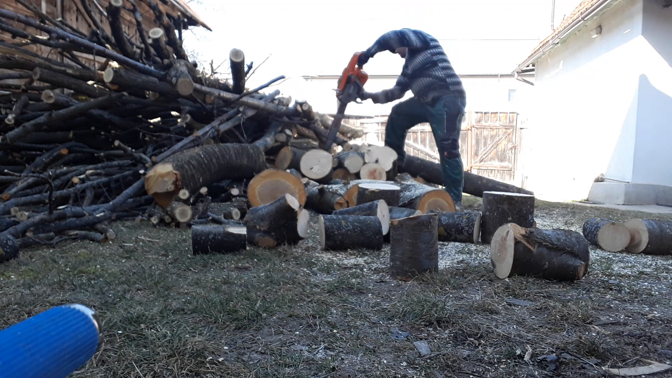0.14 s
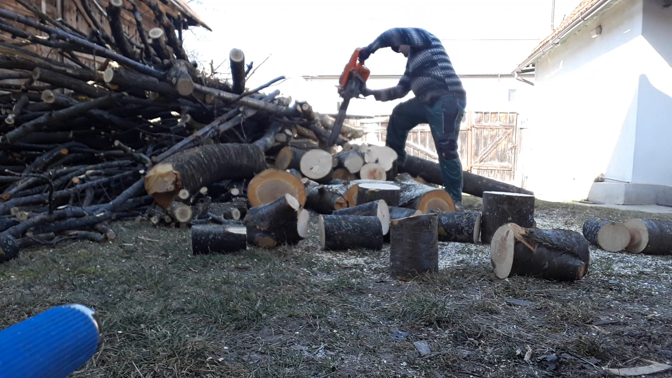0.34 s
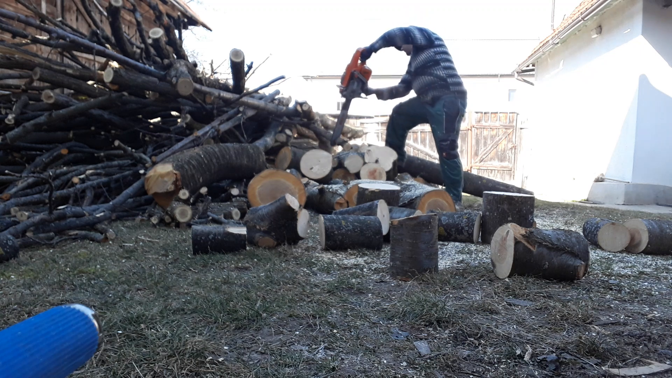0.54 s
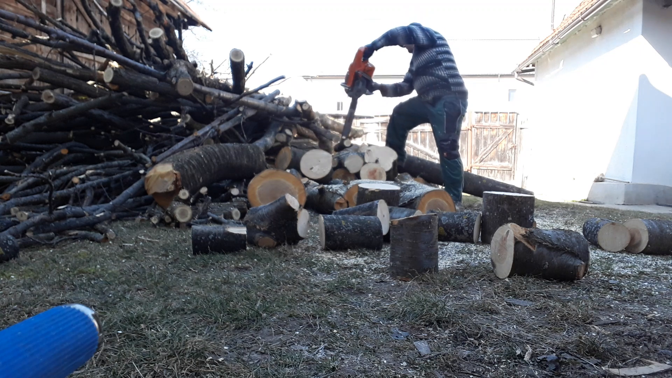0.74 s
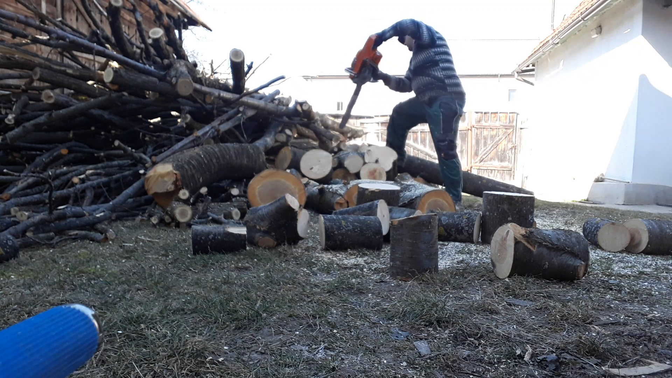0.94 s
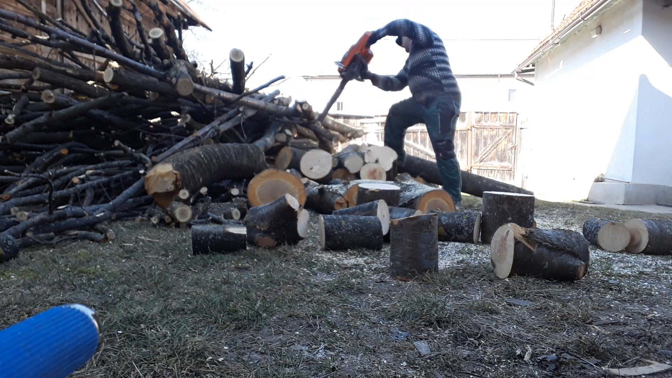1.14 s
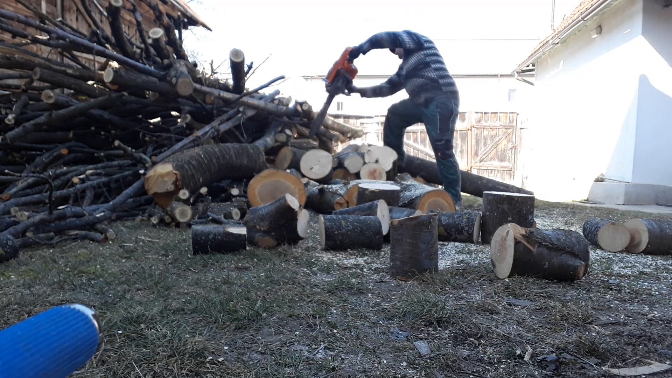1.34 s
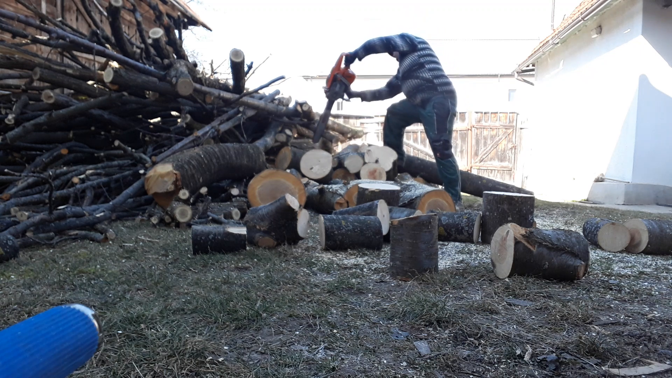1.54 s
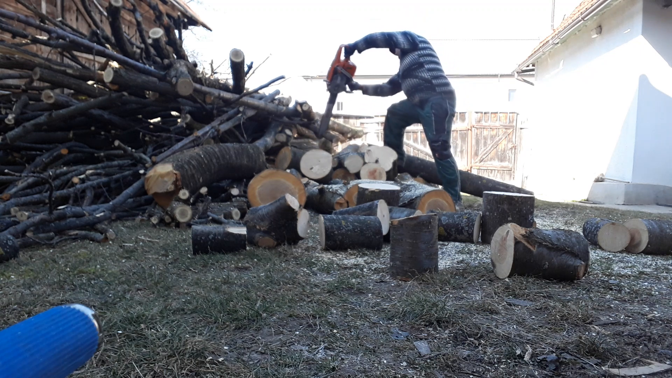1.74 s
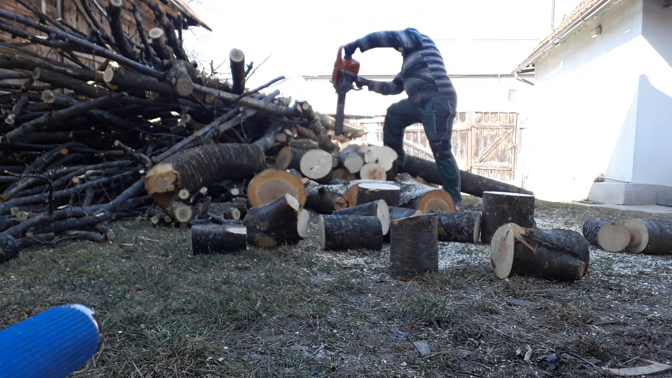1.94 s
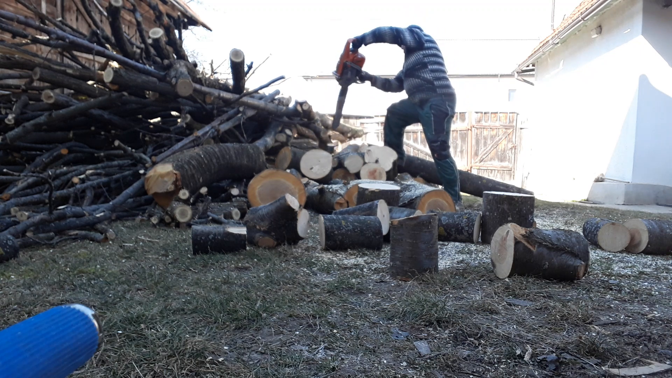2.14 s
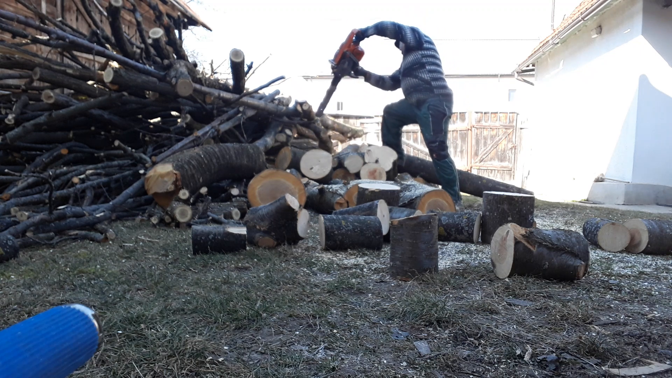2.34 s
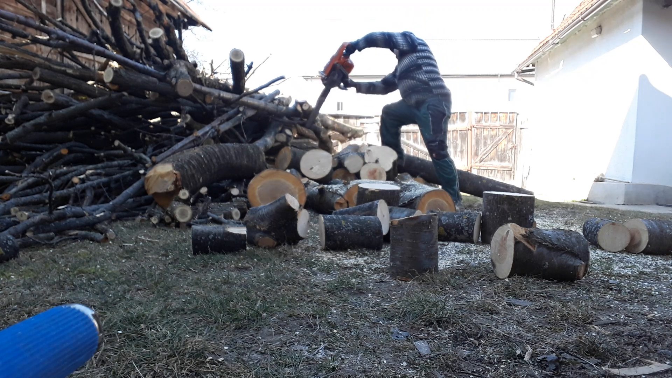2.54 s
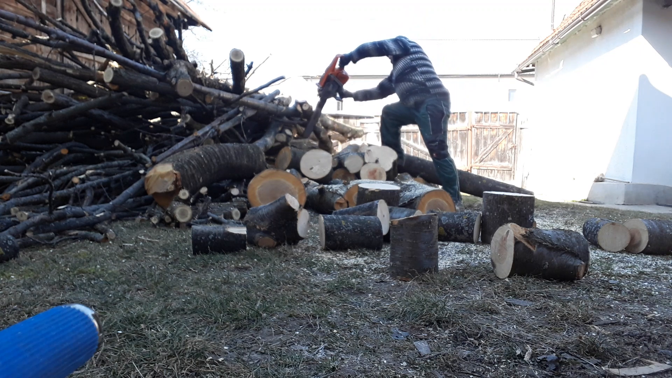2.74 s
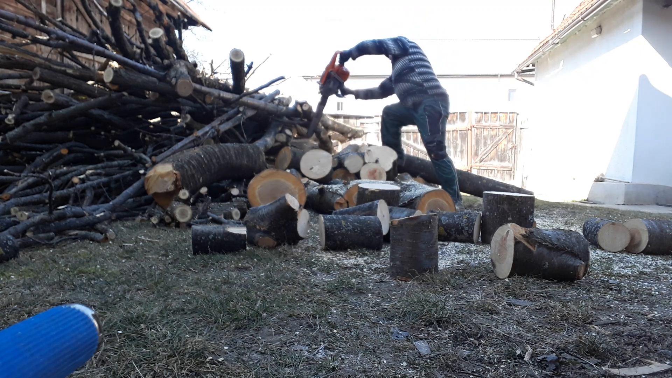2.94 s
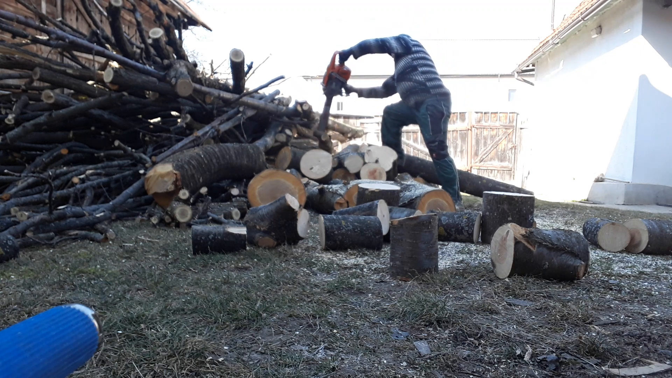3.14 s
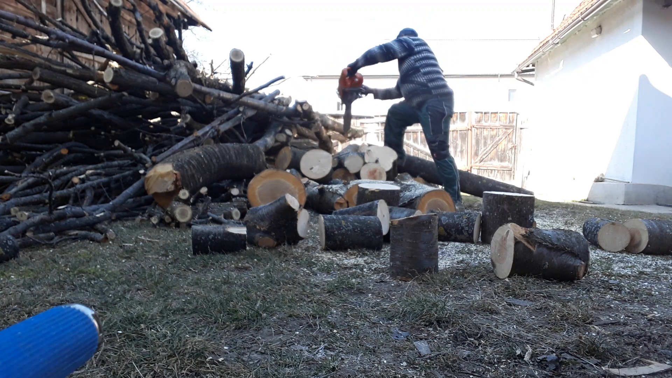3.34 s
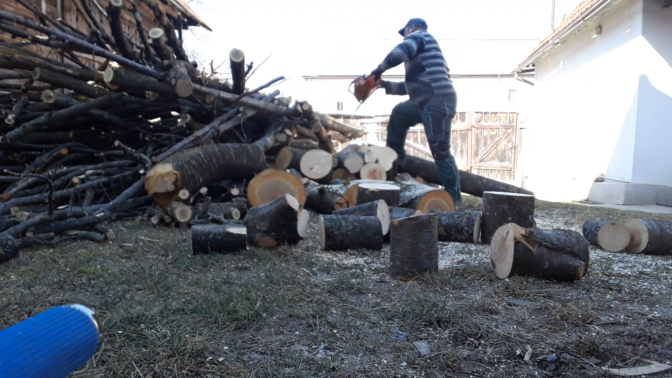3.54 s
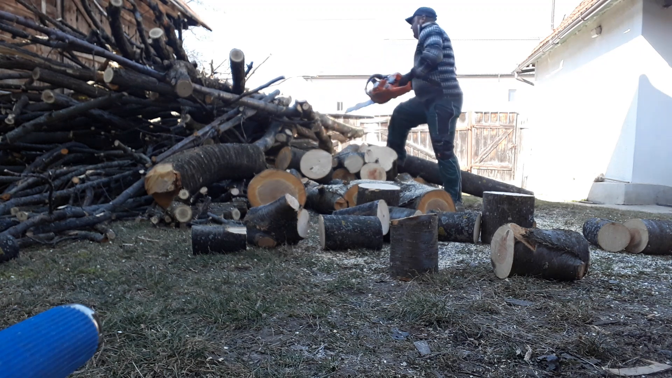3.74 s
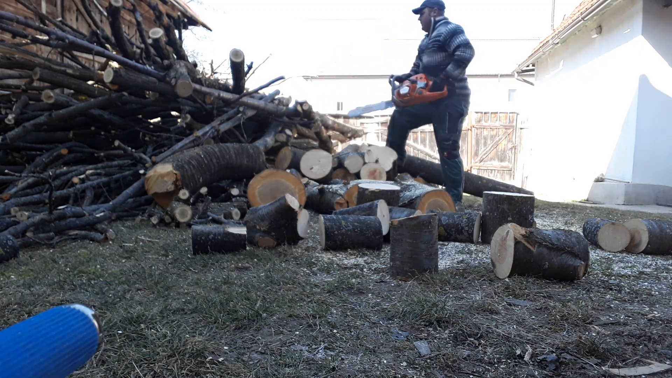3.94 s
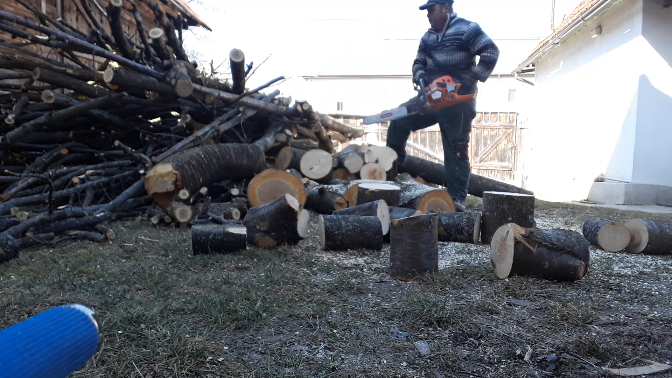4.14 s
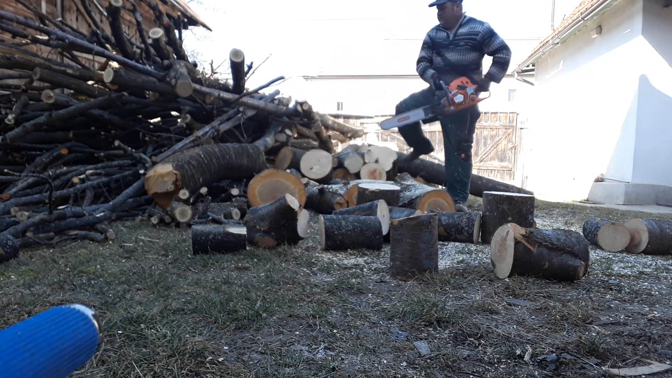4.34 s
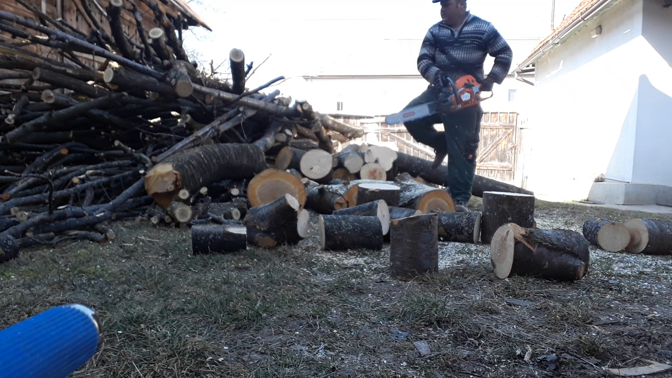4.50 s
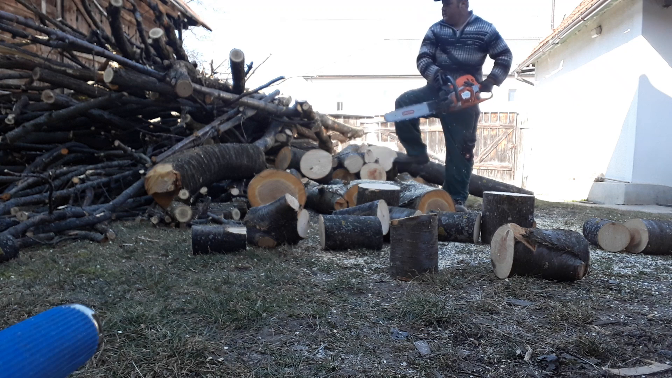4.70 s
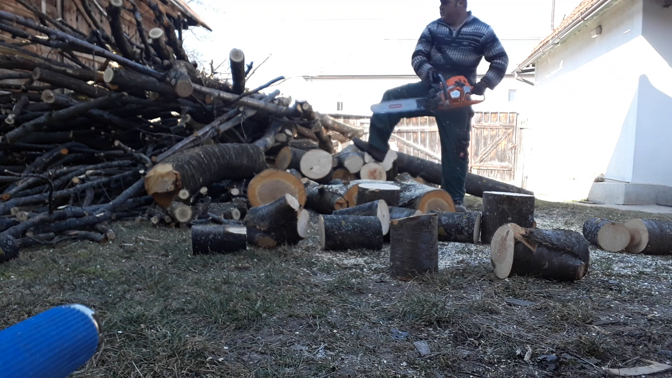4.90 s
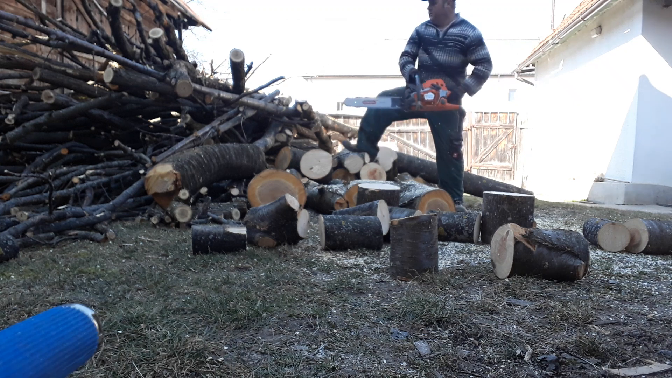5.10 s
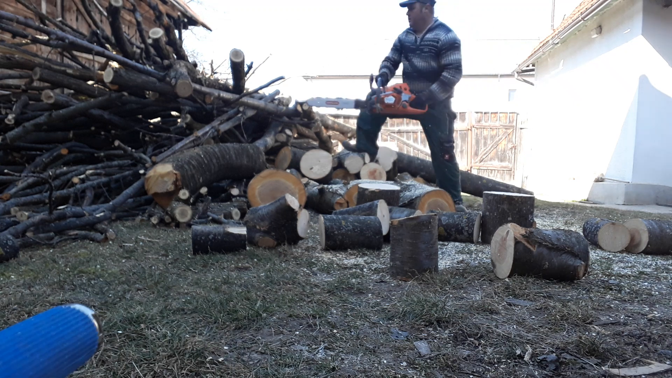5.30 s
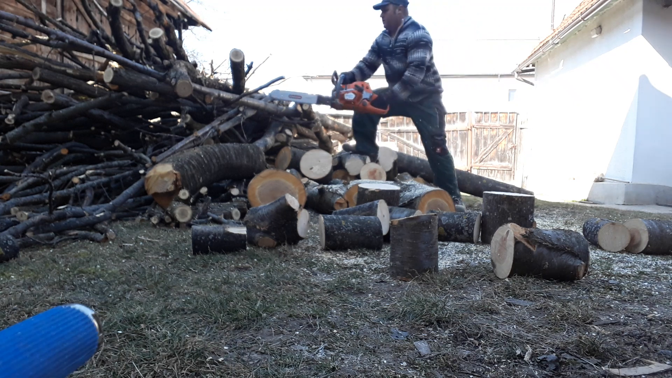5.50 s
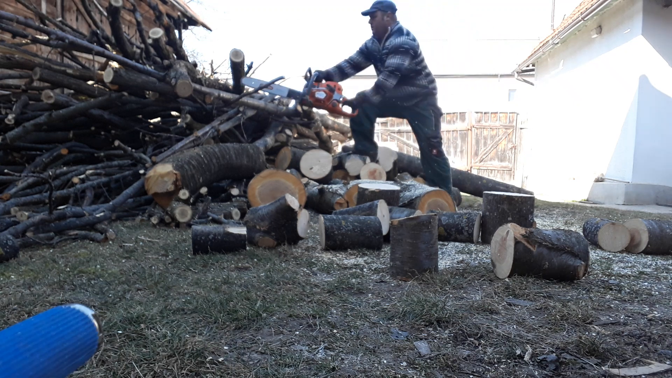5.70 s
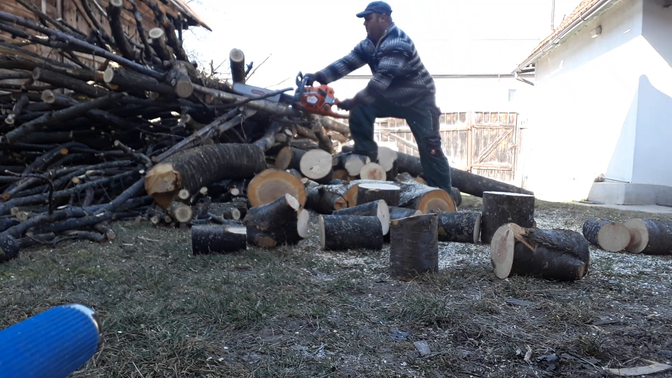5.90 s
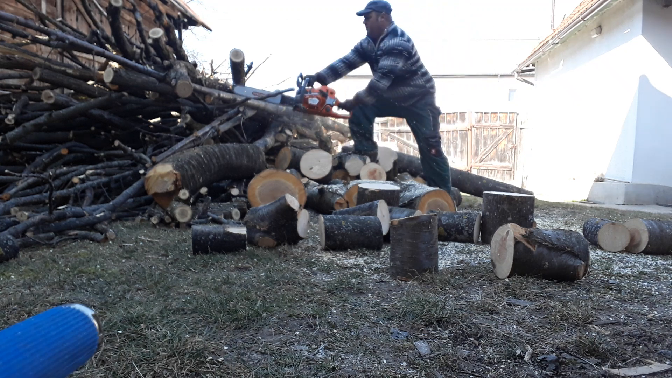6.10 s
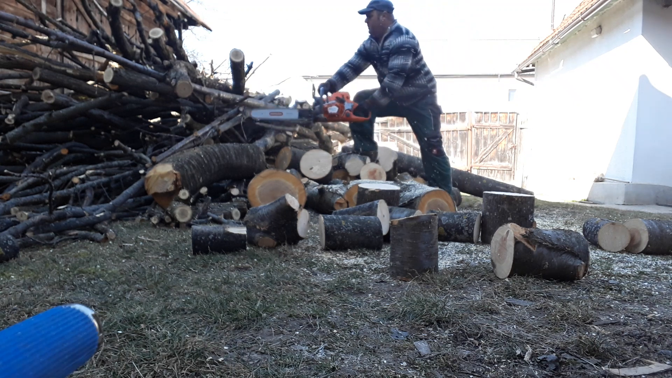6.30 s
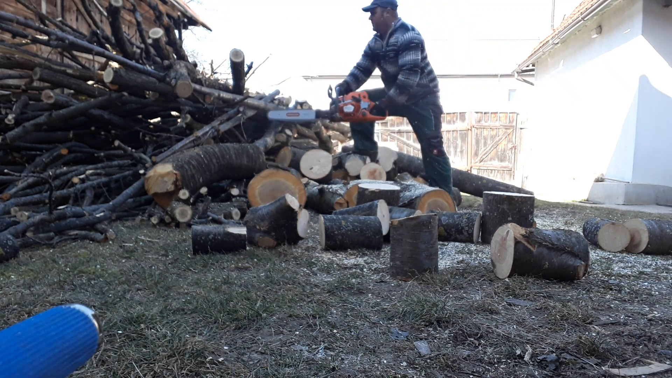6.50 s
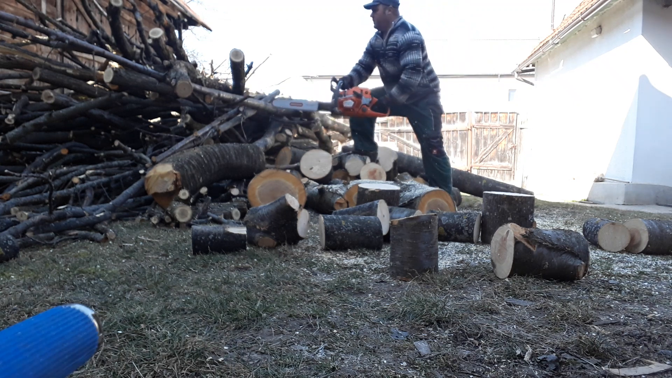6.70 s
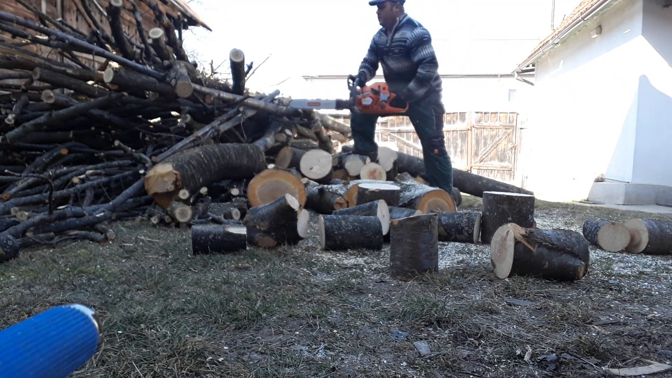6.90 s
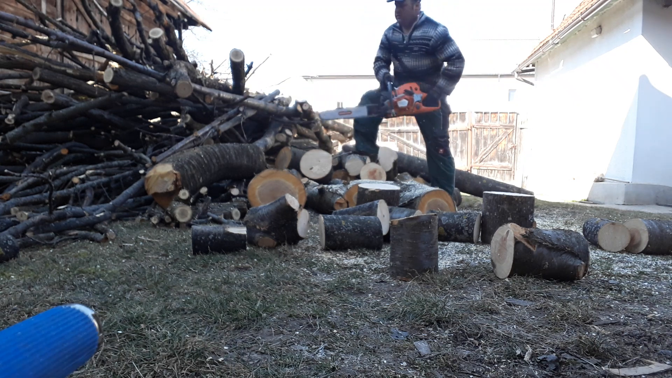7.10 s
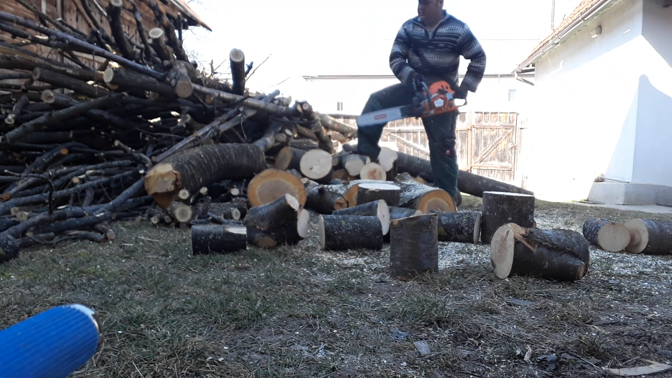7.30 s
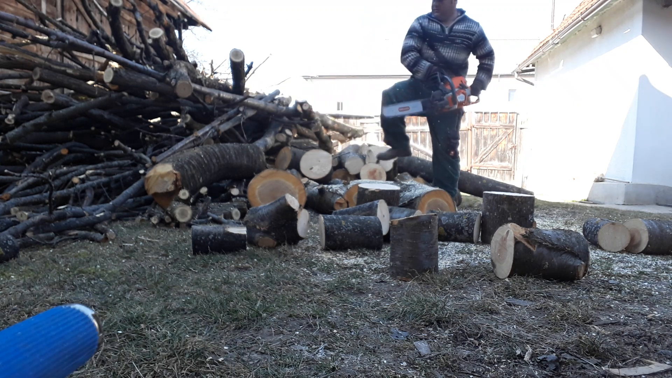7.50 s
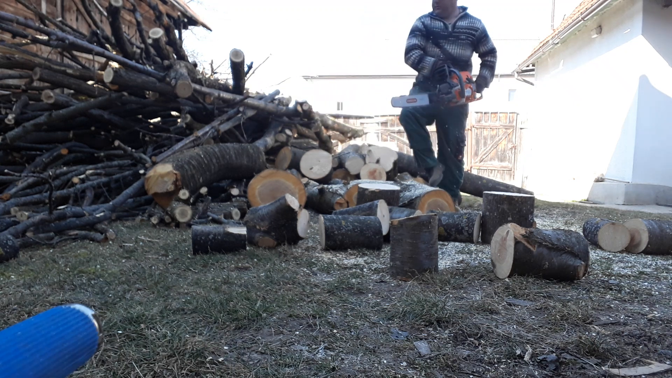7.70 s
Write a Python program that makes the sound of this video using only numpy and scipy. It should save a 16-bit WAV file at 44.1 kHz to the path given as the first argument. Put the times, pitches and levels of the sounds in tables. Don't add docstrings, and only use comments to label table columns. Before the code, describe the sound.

Small two-stroke saw engine heard at close-to-medium distance outdoors, with short slap off a wall and log pile. It swoops up and down in three blips without cutting wood, settles to stuttering idle with sharp isolated cracks, leaps up hard, dips, revs to its highest scream with jangling clutch metal, then sinks back to rough idle. Loud and bright, the microphone lightly clipped at peaks.

```python
import sys
import numpy as np
from scipy import signal
from scipy.fft import rfft, irfft, next_fast_len
from scipy.io import wavfile
from scipy.ndimage import uniform_filter1d, map_coordinates

SR = 44100
rng = np.random.default_rng(int(sys.argv[2]) if len(sys.argv) > 2 else 0)


def materialize(psi):
    bounded = np.clip(np.atleast_2d(psi).T, -1, 1)
    quanta = np.round(bounded * 32767).astype(np.int16)
    wavfile.write(sys.argv[1], SR, quanta)


def attenuation_scalar(level_db):
    decades = np.asarray(level_db, float) / 20
    return 10 ** decades


N = 341775

# t/s, speed/(turns per s)
CRANK_RUNS = [
    [(0, 169.5), (.135, 141), (.24, 159), (.34, 176.6), (.47, 197.6), (.56, 206.3), (.655, 218.5),
     (.69, 214.5)],
    [(1.425, 79), (1.51, 118), (1.57, 134.2), (1.62, 143.1), (1.81, 172), (1.875, 179), (1.95, 198),
     (1.995, 211.5)],
    [(2.69, 81.5), (2.74, 102.4), (2.81, 129), (2.91, 150.2), (3.0, 161.3), (3.15, 174.7), (3.24, 205.8),
     (3.27, 212), (3.32, 217)],
    [(3.82, 107.1), (4.18, 67), (4.55, 61)],
    [(4.86, 46), (4.94, 72.8), (4.98, 97.5), (5.07, 146), (5.14, 183.4), (5.18, 202.3), (5.22, 213)],
    [(5.68, 116.6), (5.785, 104), (5.89, 151), (5.98, 174.7), (6.09, 197.6), (6.18, 212), (6.26, 234),
     (6.325, 236.5), (6.39, 216.5)],
    [(6.93, 105.9), (7.19, 73.5), (7.75, 51.5)],
]
# opening t/s, shutting t/s, punch of the first firings/dB,
# exhaust toward the listener while open/dB, while coasting/dB
PULLS = [
    (-1, -.2, 0, 0, 7),
    (.13, .675, 1, -1.5, 0),
    (1.425, 1.98, 1, -4, 2),
    (2.695, 3.27, 2, -3.5, 1.5),
    (4.87, 5.218, 11, 2, 2.5),
    (5.78, 6.325, 1, 1.5, -1),
]
# metal running up/dB, metal coasting/dB, treble/dB, drum/dB, fan/dB
SAW_HELD = [(0, 0, 0, 0, -6), (0, 0, .5, -4, -1), (0, 2.5, -.5, -4, -12), (0, .5, .5, -4, -10),
            (0, 2, -.5, 9, 0), (0, -1, -1, 5, -4)]
OPENING_S, SHUTTING_S = .03, .012
PUNCH_S = .22
METAL_FEELS, METAL_LAG_S = .55, .025

# speed/(turns per s), then orders 1, 2, 3, 4 level/dB
LINES_OPEN_MAP = [(50, -58, -46, -38, -38), (72, -41, -33, -24, -38), (110, -28, -25, -28, -40),
                  (145, -20, -28, -42, -36), (175, -20, -29, -40, -31), (198, -18, -28, -30, -19.5),
                  (215, -19, -29, -33, -21), (238, -19, -31, -39, -23)]
# speed/(turns per s), then orders 1, 2, 3, 4 level/dB
LINES_SHUT_MAP = [(48, -66, -50, -39, -29), (66, -61, -48, -38, -36), (85, -51, -41, -41, -45),
                  (110, -43, -34.5, -43, -52), (140, -38, -34, -47, -48), (175, -37, -30, -47, -47),
                  (200, -31, -28, -38, -31), (230, -25, -33, -33, -26)]
ECHO_SPACING_HZ = 51
# strengthened f/Hz, level/dB
WALL_COMB = [(140, -7), (270, -4), (510, -5), (700, -5)]
# speed/(turns per s), bark open/dB, bark shut/dB, drum open/dB, drum shut/dB
BARK_DRUM_MAP = [(50, -24, -33, -42, -45), (75, -15.5, -36, -40, -45), (110, -24, -36.5, -38, -40),
                 (150, -21.5, -32, -32, -28), (190, -21, -26, -31, -24), (215, -19, -22, -25, -23),
                 (238, -21, -21, -22, -22)]
# speed/(turns per s), clatter level/dB, then clutch, chain, top re clatter/dB
METAL_OPEN_MAP = [(50, -33, 0, 2, -5), (100, -26.5, 0, 3, -2), (150, -22.5, 2, 2.5, -1),
                  (200, -19.5, 3, 1, -3), (238, -19, 3, 1, -4)]
# speed/(turns per s), clatter level/dB, then clutch, chain, top re clatter/dB
METAL_SHUT_MAP = [(50, -34, -2, 0, -11.5), (78, -35.5, -2, 0, -3.5), (110, -28, -1.5, -2.5, -5.5),
                  (150, -23.5, -.5, -3, -6), (200, -20, 1, -.5, -4), (238, -18.5, 1, .5, -3.5)]
FAN_DB, FAN_DB_PER_OCTAVE, FAN_TOP = -21, 45, 215

# f/Hz, width/Hz, level/dB
MUFFLER_MODES = [(536, 140, -0.5), (646, 280, -11), (825, 258, 11.5), (900, 300, 5.5), (1066, 70, 5),
                 (1321, 47, 4), (1413, 61, 4.5)]
# f/Hz, width/Hz, level/dB
COLD_MODES = [(662, 190, -5.5), (776, 79, 0), (1280, 106, -6.5)]
# f/Hz, width/Hz, level/dB
CASE_MODES = [(260, 170, 0), (400, 150, -10)]
# f/Hz, level/dB per Hz
GAS_SPECTRUM = [(25, -45), (50, -47), (90, -14), (160, -9), (350, -9.5), (500, -18), (800, -4),
                (1300, -120)]
# f/Hz, width/Hz, level/dB
BODY_MODES = [(1921, 193, -5), (2498, 277, 4), (2790, 900, 1), (3287, 111, 5.5), (3810, 284, -6.5)]
# f/Hz, width/Hz, level/dB
CLUTCH_MODES = [(4098, 320, -5), (4364, 250, 3.5), (4687, 600, 1), (5265, 300, -2)]
# f/Hz, width/Hz, level/dB
CHAIN_MODES = [(5695, 300, -1.5), (6450, 210, 1.5), (6920, 173, 1), (7910, 490, -3), (8350, 270, 1.5),
               (9370, 940, -0.5)]
# f/Hz, width/Hz, level/dB
TOP_MODES = [(10550, 260, -12), (11500, 480, -6.5), (12550, 700, -9.5), (13830, 890, -7.5),
             (15020, 1200, -11)]
# f/Hz, width/Hz, level/dB
DRUM_MODE = [(4390, 130, 0)]
# order of the crank, level/dB
FAN_ORDERS = [(18, -5), (19, -12), (20, 0), (21, -12), (22, -10)]
# delay t/s, level/dB
REFLECTIONS = [
    (.0032, -12),
    (.0128, -14),
    (.027, -15),
]
# f/Hz, 60 dB decay t/s
YARD_DECAY = [(150, 0.63), (1000, 0.31), (10000, 0.05)]
# t/s, peak level/dB, crack re peak/dB
LONE_FIRINGS = [(3.987, -24, -1), (4.259, -21.5, 0), (4.384, -23, -1), (4.497, -20, -2), (4.611, -23, -4),
                (4.63, -22, -4), (4.667, -25, -1), (4.705, -21, -5), (4.744, -20, -6), (4.804, -23, -2),
                (4.825, -21, -5), (4.846, -18, -2), (4.884, -17, -2), (4.906, -12, -6), (5.714, -22, 1),
                (7.129, -26, -3), (7.221, -27, -4), (7.293, -23, -4), (7.4, -24, -6), (7.497, -23, -5),
                (7.628, -21, -2), (7.722, -21, -1)]


def unit(x):
    return x / np.sqrt(np.mean(x ** 2) + 1e-20)


def along(points, x):
    at, value = np.transpose(points)
    return np.interp(np.log(x + 1), np.log(at + 1), value)


def wobble(rate):
    coarse = np.arange(0, N + 64, 64)
    knots = rng.standard_normal(int(N * rate / SR) + 4)
    return np.interp(np.arange(N), coarse, map_coordinates(knots, [coarse * rate / SR]))


def swell(depth_db, rate):
    return attenuation_scalar(depth_db * wobble(rate))


def filtered(x, response):
    m = next_fast_len(N + SR // 2)
    return irfft(rfft(x, m) * response(np.fft.rfftfreq(m, 1 / SR)), m)[..., :N]


def rung(x, modes):
    def response(f):
        total = 0
        for k, (centre, width, db) in enumerate(modes):
            damping = 1j * f * width
            total = total + (-1) ** k * attenuation_scalar(db) * damping / (centre ** 2 - f ** 2 + damping)
        return total
    return filtered(x, response)


def noise(spectrum):
    return unit(filtered(rng.standard_normal(N), lambda hz: attenuation_scalar(along(spectrum, hz))))


def steady(x):
    return x / np.sqrt(np.abs(uniform_filter1d(x ** 2, size=SR // 10)) + 1e-12)


def per_turn(turns):
    return rng.standard_normal(2000)[turns.astype(int)]


def beat(turns, sharp):
    return np.exp(-sharp * (turns % 1))


def crank():
    t, speed = np.transpose([point for run in CRANK_RUNS for point in run])
    speed = np.exp(np.interp(np.arange(N) / SR, t, np.log(speed)))
    speed = uniform_filter1d(speed, size=SR // 25)
    fired = np.bincount([round(s * SR) for s, *_ in LONE_FIRINGS], minlength=N)
    kick = 3.5 * signal.lfilter([1], [1, -np.exp(-1 / (.08 * SR))], fired)
    speed = speed + kick - uniform_filter1d(kick, size=SR // 6)
    return speed, np.cumsum(speed) / SR


def throttle(t):
    since = lambda s, lag: np.exp(-np.clip(t - s, 0, None) / lag)
    gas = sum((1 - since(a, OPENING_S)) * since(b, SHUTTING_S) for a, b, *_ in PULLS)
    punch_db = sum(db * (t > a) * since(a, PUNCH_S) for a, _, db, *_ in PULLS)
    return gas, gas * punch_db


def steps(t, times, rows):
    held = np.array(rows, float)[np.searchsorted(times, t) - 1]
    return uniform_filter1d(held, size=SR // 640, axis=0).T


def levels(speed):
    at = np.arange(0, N, 32)
    t, speed = at / SR, speed[at]
    gas, punch_db = throttle(t)
    grip = throttle(t - METAL_LAG_S)[0]
    read = lambda rows: np.array([along(np.array(rows)[:, [0, k]], speed) for k in range(1, 5)])
    mix = lambda opened, shut: gas * opened + (1 - gas) * shut

    pulled = [a for a, *_ in PULLS]
    up_db, coast_db, treble_db, drum_db, fan_db = steps(t, pulled, SAW_HELD)
    facing_db, coasting_db = steps(t, pulled, [row[3:] for row in PULLS])

    echo = []
    for k, (hz, db) in enumerate(WALL_COMB, start=1):
        phase = 2 * np.pi * (k * speed - hz) / ECHO_SPACING_HZ
        echo.append(attenuation_scalar(punch_db) + gas * attenuation_scalar(db) * np.exp(1j * phase))
    lines = mix(read(LINES_OPEN_MAP), read(LINES_SHUT_MAP)) + 20 * np.log10(np.abs(echo))
    lines = lines + np.outer([0, 1, 1, 1], gas * facing_db)

    clatter, clutch, chain, top = grip * read(METAL_OPEN_MAP) + (1 - grip) * read(METAL_SHUT_MAP)
    clatter = clatter + mix(up_db, coast_db) + METAL_FEELS * punch_db
    bark_open, bark_shut, drum_open, drum_shut = read(BARK_DRUM_MAP)
    bark = mix(bark_open, bark_shut + coasting_db) + punch_db
    drum_level = mix(drum_open, drum_shut) + drum_db
    whine = FAN_DB + fan_db + FAN_DB_PER_OCTAVE * np.log2(speed / FAN_TOP)

    fine = lambda db: np.interp(np.arange(N), at, db)
    metal_db = [fine(db) for db in (clatter, clutch, chain + treble_db / 2, top + treble_db)]
    return dict(lines=[fine(db) for db in lines], metal=metal_db, bark=fine(bark),
                drum=fine(drum_level), fan=fine(whine))


def hum(speed, turns, lines_db):
    uneven = 1.2 + 1.2 * np.clip((95 - speed) / 30, 0, 1)
    total = 0
    for k, db in enumerate(lines_db, start=1):
        drift_db = uneven * (wobble(18) + 1.2 * wobble(40))
        total = total + np.sqrt(2) * attenuation_scalar(db + 0.72 + drift_db) * np.sin(2 * np.pi * k * turns - k)
    return total


def exhaust(speed, turns, fourth_db, bark_db):
    shaky = turns + .008 * wobble(60)
    pulses = sum(swell(3.5, 14) * np.cos(2 * np.pi * k * shaky) for k in range(5, 20))
    pulses = pulses * attenuation_scalar(1.5 * per_turn(turns + .5))
    slow = np.clip((95 - speed) / 30, 0, 1)
    pump = attenuation_scalar(fourth_db - 8.5) * slow * steady(rung(rung(pulses, CASE_MODES), CASE_MODES))

    rough = .45 - .29 * np.clip((bark_db + 36) / 9, 0, 1)
    puffs = rng.standard_normal(N) * beat(turns, sharp=2.5) * attenuation_scalar(2.5 * per_turn(turns))
    drive = np.sqrt(1 - rough) * steady(pulses) + np.sqrt(rough) * 2.2 * steady(puffs)
    bark = (1 - slow) * steady(rung(drive, MUFFLER_MODES)) + .55 * slow * steady(rung(drive, COLD_MODES))
    rumble = attenuation_scalar(bark_db - 16 + 2.5 * wobble(14)) * noise(GAS_SPECTRUM)
    return pump + attenuation_scalar(bark_db - 0.5) * bark + rumble


def metal(speed, turns, clatter_db, clutch_db, chain_db, top_db):
    strike = attenuation_scalar(1.8 * per_turn(turns)) * np.clip((110 / speed) ** 1.5, .6, 2.3)
    gate = .7 + beat(turns + .02 * wobble(40), sharp=3) * strike
    gate = gate * swell(.5, 12) * swell(.5, 35)

    knock = 0
    for k in range(8, 17):
        phase = 2 * np.pi * k * turns + .7 * wobble(40)
        knock = knock + attenuation_scalar(-3 * (k % 2)) * swell(3, 22) * np.cos(phase)
    knock = attenuation_scalar(-8) * unit(knock) * np.sqrt(speed / 200)

    def layer(modes, db, tone):
        clatter = steady(rng.standard_normal(N) * gate)
        return attenuation_scalar(clatter_db + db + 0.73 * wobble(20)) * steady(rung(clatter + tone, modes))

    low = layer(BODY_MODES, .3, knock) + layer(CLUTCH_MODES, clutch_db - 4.5, 0)
    return low + layer(CHAIN_MODES, chain_db + .1, 0) + layer(TOP_MODES, top_db + .1, 0)


def drum(ring_db):
    jangle = rng.standard_normal(N) * swell(2.5, 30)
    return attenuation_scalar(ring_db - 3.5) * unit(rung(jangle, DRUM_MODE))


def fan(turns, whine_db):
    lines = 0
    for k, db in FAN_ORDERS:
        phase = 2 * np.pi * k * turns + .5 * wobble(40)
        lines = lines + attenuation_scalar(db) * swell(2.5, 25) * np.cos(phase)
    return attenuation_scalar(whine_db + 5.5) * lines


def yard(x, wet_db):
    hz, t, z = signal.stft(rng.standard_normal(SR // 2), SR, nperseg=256)
    decay = attenuation_scalar(-60 * t / along(YARD_DECAY, hz)[:, None])
    tail = signal.istft(z * decay, SR, nperseg=256)[1]
    delays = lambda f: 1 + sum(attenuation_scalar(db) * np.exp(-2j * np.pi * f * s) for s, db in REFLECTIONS)
    late = signal.fftconvolve(np.pad(x, (1300, 0)), tail / np.linalg.norm(tail))[:N]
    return filtered(x, delays) + attenuation_scalar(wet_db) * late


def pops():
    knocks, crack, t = np.zeros(N + SR), np.zeros(N + SR), np.arange(SR // 10) / SR
    for s, db, crack_db in LONE_FIRINGS:
        ring = sum(attenuation_scalar(level - 27 * width * t) * np.sin(2 * np.pi * hz * t) for hz, width, level in COLD_MODES)
        thump = attenuation_scalar(-60 * t / .05) * np.sin(2 * np.pi * 150 * t)
        start = round(s * SR)
        knocks[start:][:len(t)] -= attenuation_scalar(db + .5) * ring + attenuation_scalar(db - 3) * thump
        crack[start:][:len(t)] += attenuation_scalar(db + crack_db + 4 - 60 * t / .028)
    modes = BODY_MODES[1::2] + CLUTCH_MODES[1:2] + CHAIN_MODES[::2] + TOP_MODES[1::2]
    return knocks[:N] + crack[:N] * unit(rung(rng.standard_normal(N), modes))


def scene():
    speed, turns = crank()
    db = levels(speed)
    saw = exhaust(speed, turns, db["lines"][3], db["bark"]) + metal(speed, turns, *db["metal"])
    saw = saw + drum(db["drum"]) + fan(turns, db["fan"]) + pops()
    floor = attenuation_scalar(-53) * noise(GAS_SPECTRUM)
    bass = hum(speed, turns, db["lines"])
    return np.tile(bass + attenuation_scalar(-1.49) * yard(saw, wet_db=-9.5) + floor, (2, 1))


def top_cut(x):
    return signal.sosfilt(signal.butter(12, 15740, fs=SR, output="sos"), x)


def record(dry):
    clipped = dry / (1 + np.abs(dry / .97) ** 8) ** (1 / 8)
    hz, t, z = signal.stft(clipped[0], SR, nperseg=1024)
    filled = np.zeros(z.shape)
    for s, low_hz in rng.uniform([.1, 4200], [7, 14500], (26, 2)):
        filled[np.ix_(np.abs(hz - low_hz - 900) < 900, np.abs(t - s) < .02)] = 1
    scrambled = np.abs(z) * np.exp(2j * np.pi * rng.random(z.shape))
    side = signal.istft(attenuation_scalar(-3) * filled * scrambled, SR, nperseg=1024)[1][:N]
    limited = filtered(clipped + [side, -side], lambda hz: (hz < 15740) / (1 + (58 / (hz + 1)) ** 4))
    return top_cut(limited)


dry = scene()
out = record(dry)
materialize(out)
```